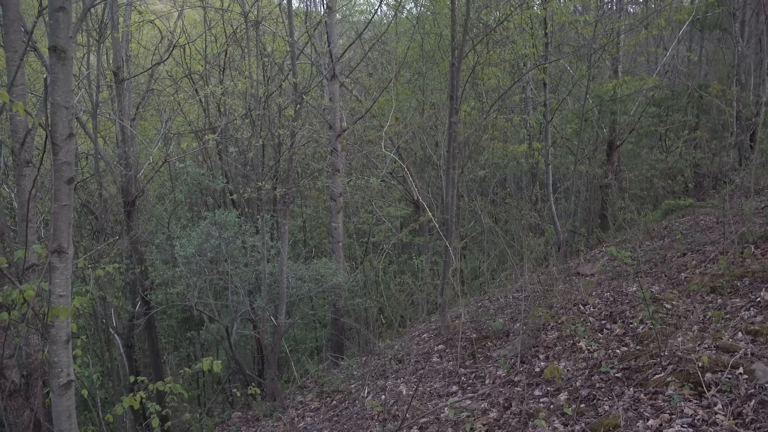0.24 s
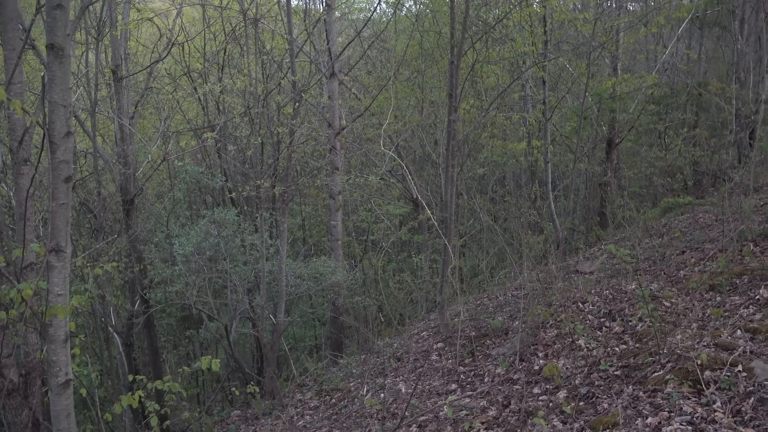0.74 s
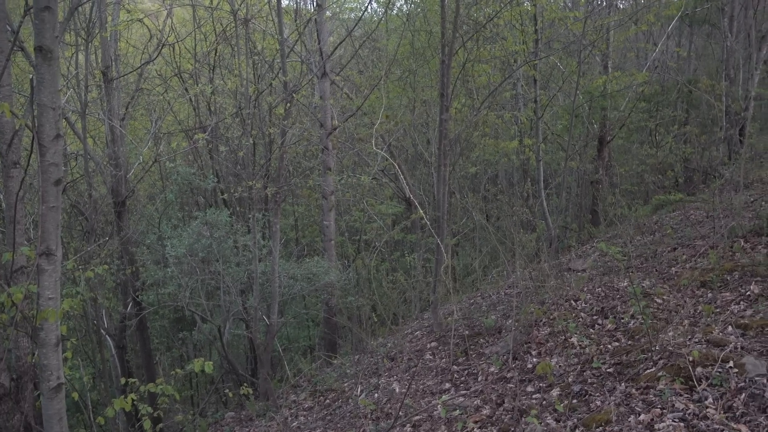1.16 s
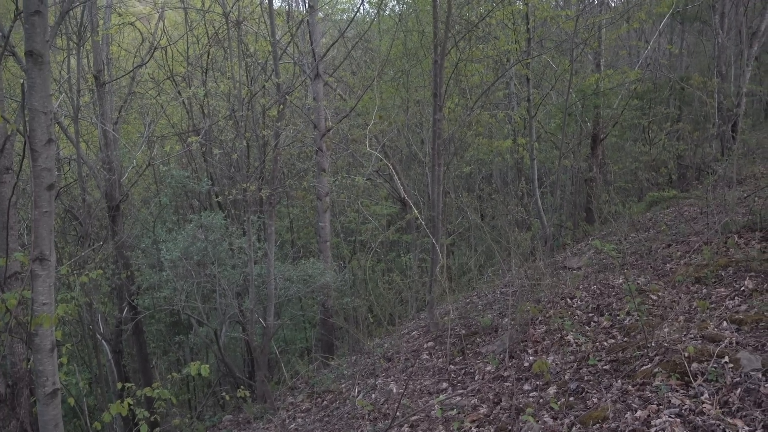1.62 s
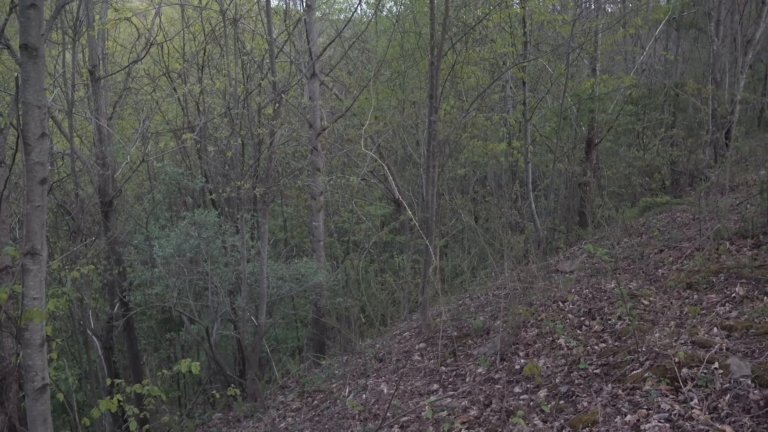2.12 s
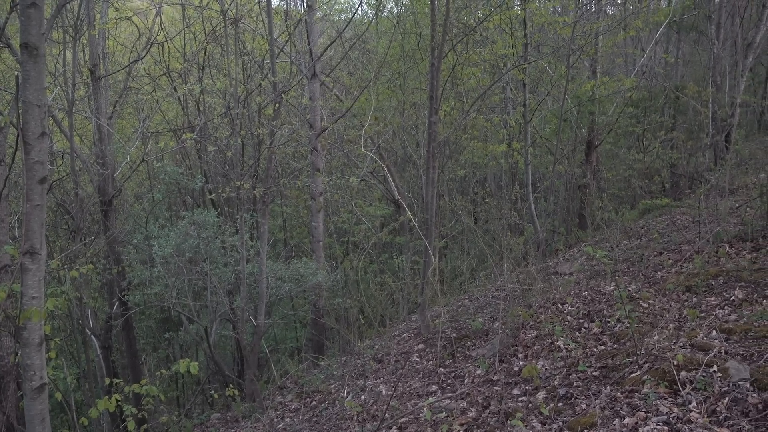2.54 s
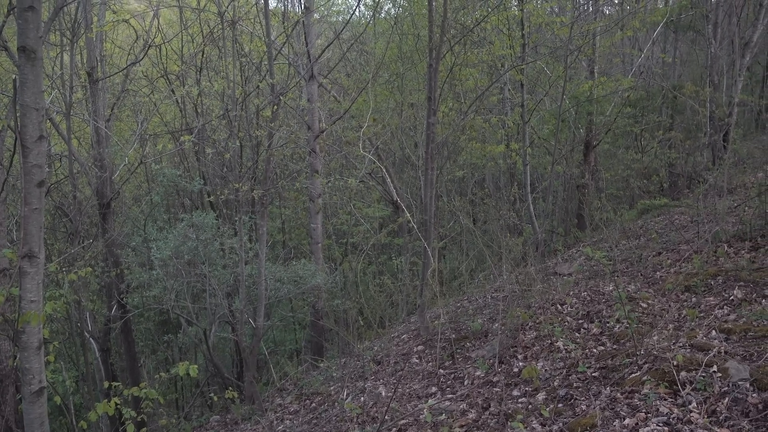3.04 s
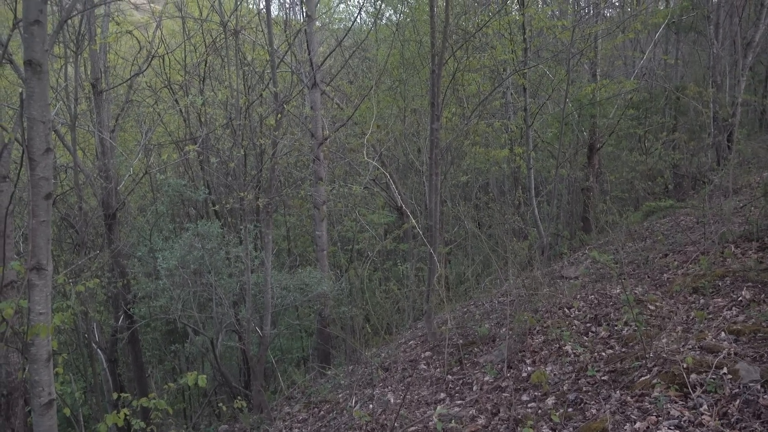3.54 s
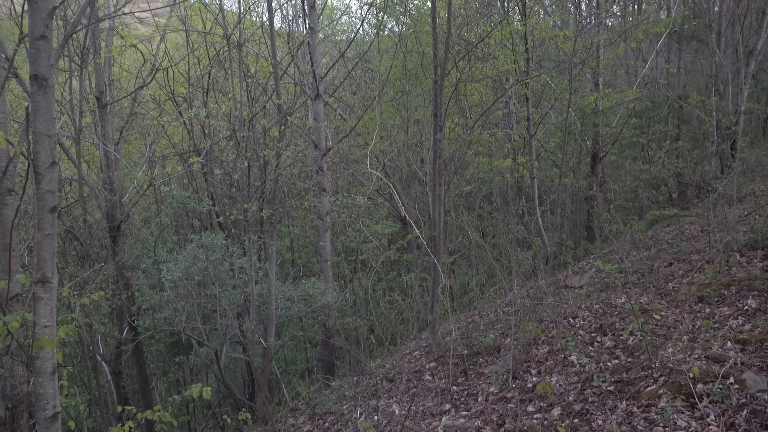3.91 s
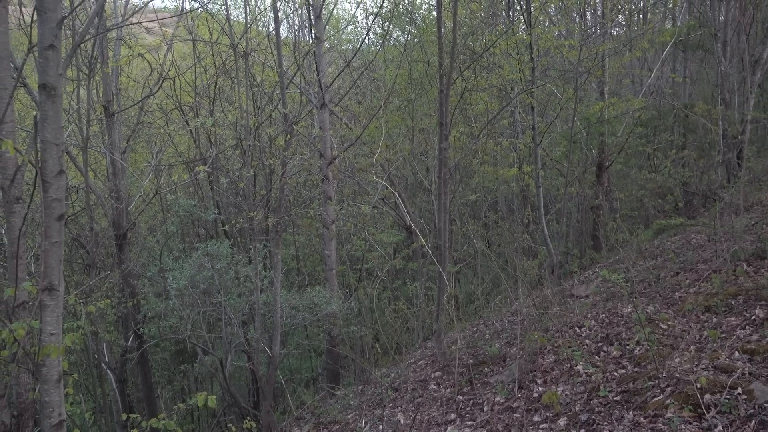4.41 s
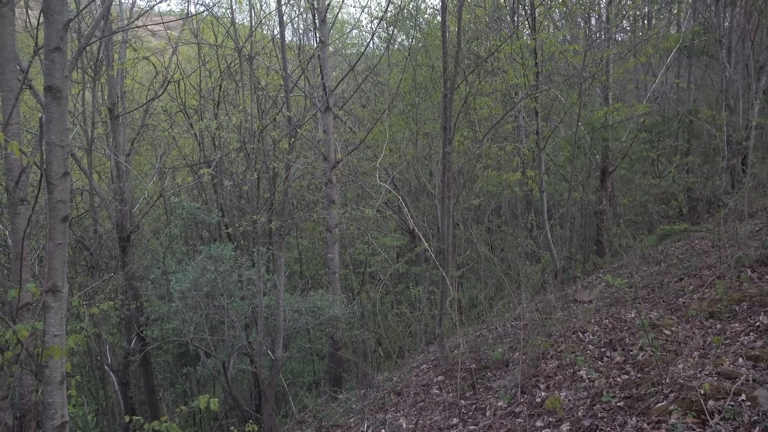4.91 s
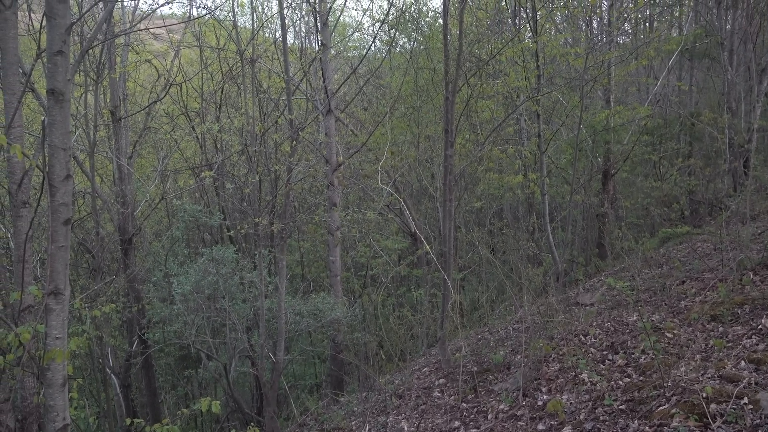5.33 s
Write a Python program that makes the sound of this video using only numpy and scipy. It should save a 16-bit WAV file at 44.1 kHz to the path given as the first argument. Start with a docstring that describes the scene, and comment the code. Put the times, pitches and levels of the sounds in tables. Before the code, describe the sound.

An owl hoots four times nearby, holding the last note, and a distant turkey answers through an echoing forest with faint birdsong.

```python
"""A close owl gives three short hoots and a long one on a wooded slope; a distant turkey gobbles back.
The owl's membrane drives overtones and puffs of air through a fixed windpipe; the turkey's uneven
pulses ring its throat, chest and beak. Small birds whistle far off, twigs tick, leaves hiss and wind
rumbles faintly. Trunks scatter every call, and gain control ducks the hush."""
import sys
import numpy as np
from scipy import signal
from scipy.fft import rfft, irfft
from scipy.io import wavfile
from scipy.ndimage import uniform_filter1d

SR = 44100
rng = np.random.default_rng(int(sys.argv[2]) if len(sys.argv) > 2 else 0)


def output_pcm(signal):
    """Save a mono or channel-first signal as 16-bit PCM at the path in sys.argv[1].

    Samples are clipped to [-1, 1] before scaling.
    """
    pcm = np.clip(np.atleast_2d(signal).T, -1, 1) * 32767
    wavfile.write(sys.argv[1], SR, np.round(pcm).astype(np.int16))


N = 245195

# owl windpipe resonances: centre_hz, width_hz, tone_db, slack_rasp_db, taut_rasp_db
WINDPIPE_MODES = [(378, 900, -32.5, -50.5, -51), (652.5, 138, 14.5, -5, 6), (1787, 120, -15.5, 4.5, 2),
                  (2690, 180, -33, -23.5, -6.5), (3028, 500, -23.5, -1, -3.5),
                  (4726, 97, -31.5, 5.5, -18.5), (5740, 160, -31.5, -20, -8), (6930, 520, -28, -16, -17),
                  (9200, 350, -60, -11.5, -29)]


def gain_of(db):
    return 10 ** (np.asarray(db) / 20)


def unit_rms(x):
    return x / np.sqrt(np.mean(x ** 2) + 1e-20)


def curve_at(points, hz):
    point_hz, value = np.transpose(points)
    return np.interp(np.log(hz + 1), np.log(point_hz + 1), value)


def add(mix, start_s, sound):
    part = mix[round(start_s * SR):][:len(sound)]
    part += sound[:len(part)]


def resonate(x, hz, width_hz):
    """Resonance: shift hz to zero, smooth, shift back."""
    carrier = np.exp(2j * np.pi * np.cumsum(hz * np.ones(len(x))) / SR)
    pole = np.exp(-np.pi * width_hz / SR)
    return 2 * (carrier * signal.lfilter([1 - pole], [1, -pole], x / carrier + 1e-18)).real


def ring(x, hz, width_hz):
    """Steep two-stage resonance, rms 1."""
    return unit_rms(resonate(resonate(x, hz, width_hz), hz, width_hz))


def wobble(size, top_hz):
    """Low-passed noise, rms 1."""
    lowpass = np.exp(-(np.fft.rfftfreq(size, 1 / SR) / top_hz) ** 2)
    return unit_rms(irfft(rfft(rng.standard_normal(size)) * lowpass, size))


def hush():
    """Far leaves and microphone hiss, with faint drifting patches."""
    # noise spectrum: freq_hz, relative_db
    spectrum = [(12, -33), (20, -31), (49, -4), (76, -5.5), (129, -4.5), (171, 1), (232, -6.5), (479, -3.5),
                (791, -7.5), (1110, -13.5), (3370, -23), (3980, -25.5), (15600, -35)]
    frames, hz = N // 256 + 5, np.fft.rfftfreq(1024, 1 / SR)
    real, imag, patches = rng.standard_normal((frames, 513, 3)).T
    patches_db = 0.79 * unit_rms(uniform_filter1d(uniform_filter1d(patches, 12, 0), 14, 1))
    bins = (real + 1j * imag) * gain_of(curve_at(spectrum, hz)[:, None] + patches_db)
    return gain_of(-46) * unit_rms(signal.istft(bins, nperseg=1024, noverlap=768)[1][:N])


def wind():
    """Wind on the microphone: a low moan swelling in bell-shaped puffs."""
    # puffs: centre_s, peak_db, half_width_s
    gusts = [(0.603, -36, 0.023), (1.404, -56, 0.051), (2.029, -44, 0.07), (2.15, -42.5, 0.083),
             (2.542, -44.5, 0.063), (3.34, -55, 0.19), (3.598, -52.5, 0.082), (3.845, -48, 0.059),
             (4.541, -57, 0.064), (4.962, -45, 0.058)]
    centre_s, peak_db, half_width_s = np.transpose(gusts)[:, :, None]
    t = np.arange(0, N + 64, 64) / SR
    puffs = gain_of(peak_db) * np.exp(-((t - centre_s) / half_width_s) ** 2)
    level = gain_of(-63) + puffs.sum(0)
    moan = resonate(resonate(rng.standard_normal(N), hz=87, width_hz=20), hz=87, width_hz=27)
    return np.interp(np.arange(N) / SR, t, level) * unit_rms(moan)


def lingering_echo():
    """Dying echo of an earlier hoot: narrow-band noise."""
    level_db = -42 - 30 * np.arange(N) / SR
    return gain_of(level_db) * unit_rms(resonate(rng.standard_normal(N), hz=547, width_hz=25))


def hoot_contour(held, start_s, start_hz, peak_s, peak_db, break_s, break_hz,
                 drop_s, drop_hz, drop_db, tail_db, tail_s, floor_hz):
    """Level and pitch of a hoot: climb, choked upward break, held note, drop, falling tail."""
    attack_s, choke_s, break_db = 0.013, 0.012, -14
    catch_s, settle_s, release_s, fall_tau_s = 0.01, 0.022, 0.033, 0.023
    t = np.arange(start_s, drop_s + tail_s + release_s, 1 / SR)
    climb_s = [start_s, start_s + attack_s, peak_s, max(break_s - choke_s, (peak_s + break_s) / 2)]
    climb_db = peak_db + np.array([-22.5, -7.5, 0, -5])
    held_s, held_db, held_hz = np.transpose(held)
    # the voice drops, catches, settles, sags, fades
    ending_s = drop_s + np.array([0, catch_s, settle_s, max(tail_s, settle_s), tail_s + release_s])
    ending_db = [drop_db, tail_db + 4.5, tail_db, tail_db - 7, tail_db - 28]
    level_db = np.interp(t, np.r_[climb_s, break_s, held_s, ending_s],
                         np.r_[climb_db, break_db, held_db, ending_db])
    climb_hz = start_hz + (break_hz - start_hz) * ((t - start_s) / (break_s - start_s)) ** 1.5
    note_hz = np.interp(t, np.r_[break_s, held_s, drop_s], np.r_[break_hz, held_hz, drop_hz])
    fall_hz = floor_hz + (drop_hz - floor_hz) * np.exp((drop_s - t) / fall_tau_s)
    return t, level_db, np.select([t < break_s, t > drop_s], [climb_hz, fall_hz], note_hz)


def windpipe(hz, modes_db):
    """Complex tube response: squared modes keep the valleys dark; an air sac absorbs one band."""
    sac_hz, core_hz, skirt_hz = 1225, 83, 400
    modes = sum(gain_of(db) * (1j * hz * width_hz / (mode_hz ** 2 - hz ** 2 + 1j * hz * width_hz)) ** 2
                for (mode_hz, width_hz, *_), db in zip(WINDPIPE_MODES, modes_db))
    detuning = sac_hz ** 2 - hz ** 2
    return modes * (detuning + 1j * hz * core_hz) / (detuning + 1j * hz * skirt_hz)


def hoot(t, level_db, hz, bright_db_per_oct, hoarse_db):
    """A membrane speeds up, holds and slows to a rattle; its overtones slide through the windpipe."""
    # voice by pitch: pitch_hz, slope_db_per_oct, rasp_db
    register = [(110, -7.5, -29), (190, -5.5, -31), (270, -7, -32.5), (327, -9.5, -41), (410, -6.5, -33.5),
                (520, -8.5, -34), (579, -6, -34), (595, -3, -33.5), (642, -2, -34.5)]
    level_db, hz = uniform_filter1d([level_db, hz], size=180, mode="nearest")
    pitch_hz, *columns = np.transpose(register)
    slope_db_per_oct, rasp_db = (np.interp(hz, pitch_hz, column) for column in columns)
    slope_db_per_oct += bright_db_per_oct
    squeak_db = 6 * np.exp((t[0] - t) / 0.03)
    rasp_db += hoarse_db + squeak_db + 3.5 * wobble(len(t), top_hz=30)
    tone_db, slack_db, taut_db = np.transpose(WINDPIPE_MODES)[2:]
    jitter = 0.003 + 0.008 * np.clip((500 - hz) / 150, 0, 1)
    hz = hz * (1 + jitter * wobble(len(t), top_hz=100))
    cycles = np.cumsum(hz) / SR

    harmonic, hop = np.arange(1, 60)[:, None], 16
    partial_hz = harmonic * hz[::hop]
    flutter = unit_rms(uniform_filter1d(rng.standard_normal(partial_hz.shape), 90))
    source_db = slope_db_per_oct[::hop] * np.log2(harmonic) + 1.9 * np.log(harmonic) * flutter
    lowpass = (partial_hz < SR / 4) / (1 + (partial_hz / 8000) ** 12)
    weights = windpipe(partial_hz, tone_db) * gain_of(source_db) * lowpass
    weights /= np.sqrt((abs(weights) ** 2).sum(0) / 2)
    weights = np.repeat(weights, hop, axis=1)[:, :len(t)]
    weights = uniform_filter1d(weights.real, hop) + 1j * uniform_filter1d(weights.imag, hop)
    tone = (weights * np.exp(2j * np.pi * harmonic * cycles)).real.sum(0)

    # one puff of air per cycle; a slack membrane leaks more and swings unevenly
    puffs = rfft(rng.standard_normal(len(t)) * (1.2 + np.exp(-(cycles % 1) / 0.9)))
    bin_hz = np.fft.rfftfreq(len(t), 1 / SR)
    slack_air = unit_rms(irfft(puffs * windpipe(bin_hz, slack_db), len(t)))
    taut_air = unit_rms(irfft(puffs * windpipe(bin_hz, taut_db), len(t)))
    taut = np.clip((hz - 400) / 150, 0, 1)
    rasp = gain_of(rasp_db - 4 - 4 * taut) * ((1 - taut) * slack_air + taut * taut_air)
    shake = 1 + (0.01 + 0.11 * (1 - taut)) * wobble(len(t), top_hz=250)
    fade = np.clip(np.minimum(t - t[0], t[-1] - t) / 0.004, 0, 1)
    return gain_of(level_db) * (tone * shake + rasp) * fade


def owl():
    """Three short hoots and a long one."""
    # climb, ending and timbre per hoot: start_s, start_hz, peak_s, peak_db, break_s, break_hz, drop_s,
    # drop_hz, drop_db, tail_db, tail_s, floor_hz, bright_db_per_oct, hoarse_db
    hoots = [(0.099, 253.1, 0.15, -4, 0.16, 399.8, 0.266, 412, -24, -19, 0.023, 200, -2.5, -3.5),
             (0.514, 250.5, 0.56, -2, 0.57, 412.7, 0.69, 457, -19, -18.5, 0.029, 157.6, -1.1, 1),
             (0.92, 279.5, 0.951, -2, 0.975, 434.7, 1.095, 481.7, -18, -17.5, 0.042, 148.7, -0.26, -2.5),
             (1.325, 324.8, 1.353, -3.5, 1.371, 411, 1.818, 419, -18.5, -12, 0.12, 115.3, 0.24, 0.2)]
    # held note, one list per hoot: time_s, level_db, pitch_hz
    held_notes = [
        [(0.165, -6.5, 516), (0.178, -4.5, 547.5), (0.2, -3.5, 564), (0.22, -2.5, 557), (0.245, -8, 555),
         (0.258, -13.5, 504)],
        [(0.584, -1.5, 545), (0.597, 1, 566), (0.63, -1.5, 587.7), (0.655, -5.5, 573), (0.675, -3.5, 559.4)],
        [(0.984, -0.5, 555), (1.003, 2, 585.3), (1.03, 0, 599.7), (1.07, -3, 572.2), (1.083, -1, 555)],
        [(1.378, -6, 536.5), (1.4, 1.5, 576), (1.42, 0.5, 590), (1.45, -2, 589.3), (1.48, -0.5, 577),
         (1.545, -0.5, 599.8), (1.58, 2.5, 615), (1.65, 1, 628.2), (1.7, 2.5, 620), (1.75, 1.5, 611.3),
         (1.79, -5, 564), (1.803, -7, 556.7)],
    ]
    out = np.zeros(N)
    for (start_s, *contour, bright_db_per_oct, hoarse_db), held in zip(hoots, held_notes):
        t, level_db, hz = hoot_contour(held, start_s, *contour)
        add(out, start_s, hoot(t, level_db, hz, bright_db_per_oct, hoarse_db))
    return out


def trunk_echoes(x, onset_s):
    """Sparse reflections swell in; each band dies at its own rate."""
    # decay of the woods: freq_hz, t60_s
    decay_times = [(300, 0.8), (600, 2.45), (1200, 2.9), (3000, 4.5), (8000, 0.52)]
    taps = np.zeros(2 * SR)
    slots = np.arange(400, len(taps) - 20, 20)
    taps[slots + rng.integers(0, 20, len(slots))] = rng.choice([-1., 1.], len(slots))
    hz, t, bins = signal.stft(taps, SR, nperseg=256)
    decay = gain_of(-60 * t / curve_at(decay_times, hz)[:, None])
    tail = signal.istft(bins * decay * (1 - np.exp(-t / onset_s)), SR, nperseg=256)[1]
    return signal.fftconvolve(x, tail / np.linalg.norm(tail))[:N]


def twigs():
    """Short dry cracks of treble noise."""
    # cracks: start_s, level_db
    ticks = [(.13, -52), (.742, -53), (5.249, -47), (5.298, -55), (5.385, -54)]
    out, t, t60_s = np.zeros(N), np.arange(400) / SR, 0.012
    for start_s, level_db in ticks:
        crack = ring(rng.standard_normal(len(t)), hz=5000, width_hz=3500)
        add(out, start_s, gain_of(level_db - 60 * t / t60_s) * crack)
    return out


def birds():
    """Wavering near-sine whistles and slurs; returns direct sound and echo send."""
    # far notes: start_s, length_s, from_hz, to_hz, send_db, direct_over_send_db
    notes = [(0.869, 0.076, 4000, 3910, -73.5, 5.5), (1.138, 0.13, 4060, 4040, -62, 4.5),
             (1.288, 0.067, 4065, 4040, -63, 3), (1.412, 0.28, 4157, 3820, -65.5, 8.5),
             (1.769, 0.078, 4060, 3998, -65.5, 12.5), (1.913, 0.17, 4081, 4050, -58, 3),
             (2.103, 0.1, 4027, 3996, -54, 7.5), (2.19, .17, 4030, 4025, -69, 5),
             (2.38, .06, 4030, 4025, -68, 6), (2.46, .19, 4030, 4025, -72, 5),
             (2.25, .13, 4630, 4620, -75, 3), (2.5, .22, 2500, 1960, -60, 2),
             (3.308, .15, 2400, 2100, -61, 4), (3.63, .05, 5300, 5280, -72, 5),
             (5.25, .05, 5200, 4200, -66, 4), (5.33, .03, 4300, 3000, -69, 4),
             (5.37, .04, 3500, 5000, -67, 3), (2.52, .08, 4150, 3400, -61, 2),
             (2.6, .45, 3330, 3280, -66, -3), (3.05, .4, 3250, 3200, -64, -3),
             (3.574, 0.097, 4060, 3170, -73, -16), (4.033, 0.12, 3740, 3730, -68.5, 9.5),
             (4.204, 0.0063, 3910, 2940, -51.5, 9.5), (4.384, 0.051, 1353, 1114, -48, 4.5),
             (4.697, 0.052, 3520, 3450, -61.5, 4.5), (5.425, 0.021, 3410, 3360, -62.5, 10)]
    repeated_slurs = [(start_s, 0.1, 5350, 3300, -59.5, -1) for start_s in np.arange(2.69, 3.35, 0.121)]
    direct, send = np.zeros(N), np.zeros(N)
    for start_s, length_s, from_hz, to_hz, send_db, direct_over_send_db in notes + repeated_slurs:
        progress = np.linspace(0, 1, round(length_s * SR))
        hz = to_hz + (from_hz - to_hz) * (1 - progress) ** 2
        waver_db = 1.7 * unit_rms(uniform_filter1d(rng.standard_normal(SR // 2), 500))[:len(hz)]
        envelope = gain_of(send_db + waver_db) * signal.windows.tukey(len(hz), 0.25)
        note = envelope * np.sin(2 * np.pi * np.cumsum(hz) / SR)
        add(send, start_s, note)
        add(direct, start_s, gain_of(direct_over_send_db) * note)
    return direct, send


def turkey():
    """Bursts of uneven pulses at half the chest pitch ring the throat, chest and beak."""
    # gobble: start_s, level_db, throat_hz, chest_over_throat_db, length_s
    syllables = [(2.746, -26, 1226, -7.5, 0.051), (2.813, -26.5, 1303, -15, 0.047),
                 (2.831, -22.5, 1073, -10.5, 0.038), (2.911, -30.5, 1330, 3, 0.017),
                 (2.962, -23, 1040, -7, 0.02), (3.005, -20.5, 1062, -12, 0.035),
                 (3.025, -32, 1050, -1, 0.018), (3.042, -22.5, 1050, -15, 0.02),
                 (3.057, -19, 1054, -12.5, 0.025), (3.132, -25, 1000, -3.5, 0.017),
                 (3.176, -22, 1014, -10.5, 0.011), (3.204, -24, 970, -13, 0.029),
                 (3.222, -23, 967, -14, .02), (3.245, -30, 975, -1, 0.018), (3.305, -29, 940, -6.5, 0.021),
                 (3.354, -25.5, 935, -6, 0.0097), (3.404, -26.5, 886, -5, 0.03),
                 (3.48, -25.5, 870, -5.5, 0.015), (3.523, -27, 878, -10.5, 0.018),
                 (3.564, -32.5, 895, -23, 0.041), (3.591, -30.5, 870, -13, 0.019),
                 (3.653, -28.5, 890, -7, 0.02), (3.694, -25.5, 893, -10, 0.011),
                 (3.747, -27, 892, -12, .02), (3.776, -25.5, 876, -12, 0.011),
                 (3.83, -27.5, 847, -11.5, 0.014), (3.851, -27, 900, -31, 0.011),
                 (3.889, -34.5, 897, -25, 0.011)]
    # upper resonances: centre_hz, width_hz, level_db
    beak_modes = [(1503, 100, -13.5), (1772, 104, -19.5), (1970, 160, -22.5), (3260, 620, -18)]
    out, t = np.zeros(N), np.arange(3000) / SR
    for start_s, level_db, throat_hz, chest_db, length_s in syllables:
        elapsed_s = start_s - syllables[0][0]
        chest_hz = (660 - 120 * elapsed_s) * (1 + 0.03 * rng.standard_normal())
        jitter, breath = rng.standard_normal((2, len(t)))
        pulse_hz = chest_hz / 2 * (1 + 0.081 * unit_rms(uniform_filter1d(jitter, 120)))
        pulses = np.diff(np.floor(np.cumsum(pulse_hz) / SR + 0.744), prepend=0)
        drive = unit_rms(pulses) + 0.28 * breath
        voice = ring(drive, throat_hz, width_hz=150)
        voice += gain_of(chest_db) * ring(drive, chest_hz * (1 - 5 * t), width_hz=181)
        open_beak_db = 8 * np.exp(-elapsed_s / 0.1)  # lower modes ring louder at first
        for hz, width_hz, mode_db in beak_modes:
            voice += gain_of(mode_db + open_beak_db * (hz < 1900)) * ring(drive, hz, width_hz)
        progress = t / length_s
        attack = np.sin(np.pi / 2 * np.minimum(progress / 0.23, 1)) ** 2
        add(out, start_s, gain_of(level_db) * voice * attack * np.exp(-progress ** 1.75) / 2)
    return ring(out, hz=700, width_hz=3940) * out.std()  # distance dulls the treble


def scene():
    """Calls and their echoes over twigs, hush and wind; mono."""
    hoots, gobble = owl(), turkey()
    song, song_send = birds()
    echoes = lingering_echo()
    echoes += gain_of(-32) * trunk_echoes(hoots, onset_s=0.042)
    echoes += gain_of(-10.5) * trunk_echoes(gobble, onset_s=0.026)
    echoes += trunk_echoes(song_send, onset_s=0.013)
    return (hoots + gobble + song + echoes + twigs() + hush() + wind())[None]


def record(dry):
    """Gain control ducks during the hoots and creeps back; then a low-pass."""
    threshold_db, initial_cut_db, recovery_db_per_s, smooth_s = -28, 3.0, 4.67, 0.15
    power_db = 10 * np.log10(abs(uniform_filter1d(dry[0] ** 2, 2000)) + 1e-12)
    recovery_db = recovery_db_per_s * np.arange(N) / SR
    cut_db = 0.28 * np.maximum(power_db - threshold_db, 0)
    cut_db = np.maximum.accumulate(np.maximum(cut_db + recovery_db, initial_cut_db)) - recovery_db
    ease = 1 / (smooth_s * SR)
    cut_db = signal.lfilter([ease], [1, ease - 1], cut_db, zi=[cut_db[0]])[0]
    lowpass = signal.firwin(2047, cutoff=15740, window=("kaiser", 9), fs=SR)
    return signal.oaconvolve(dry / gain_of(cut_db), lowpass[None], "same")


dry = scene()
out = record(dry)
output_pcm(out)
```